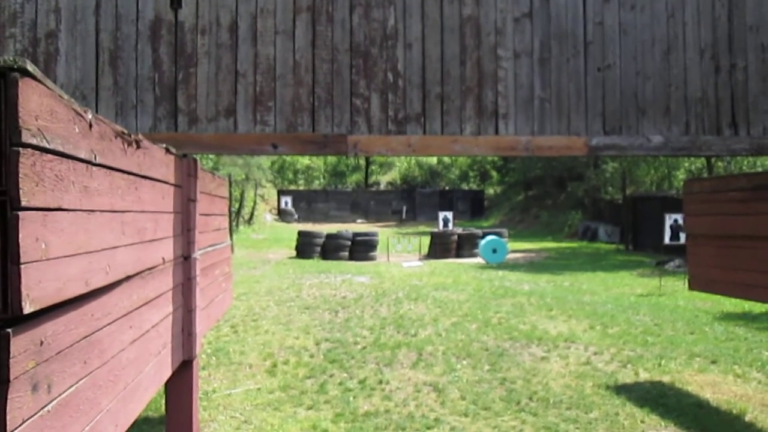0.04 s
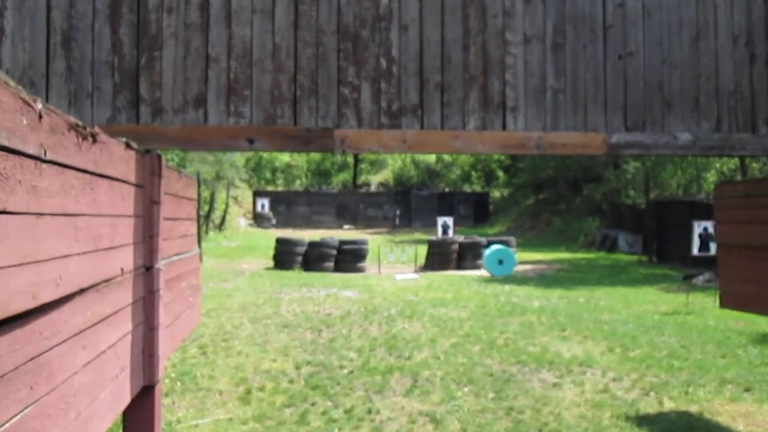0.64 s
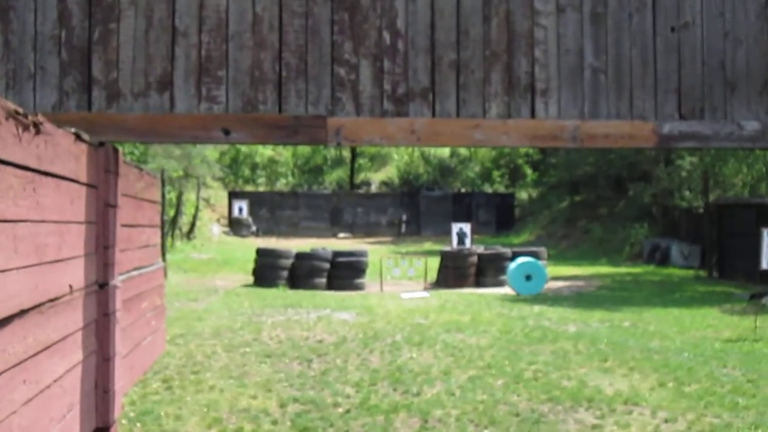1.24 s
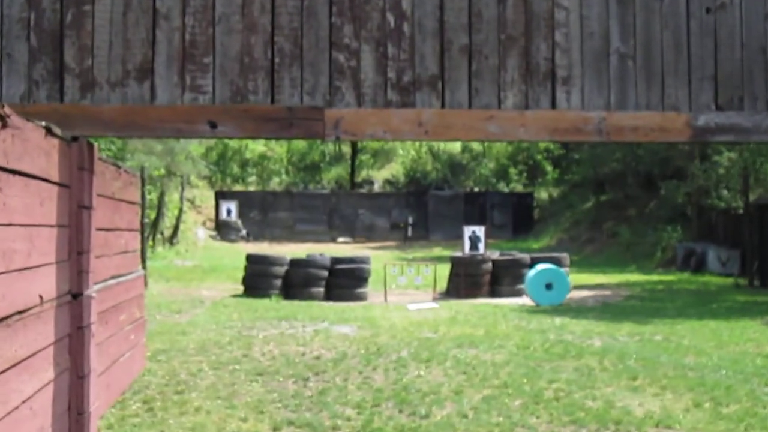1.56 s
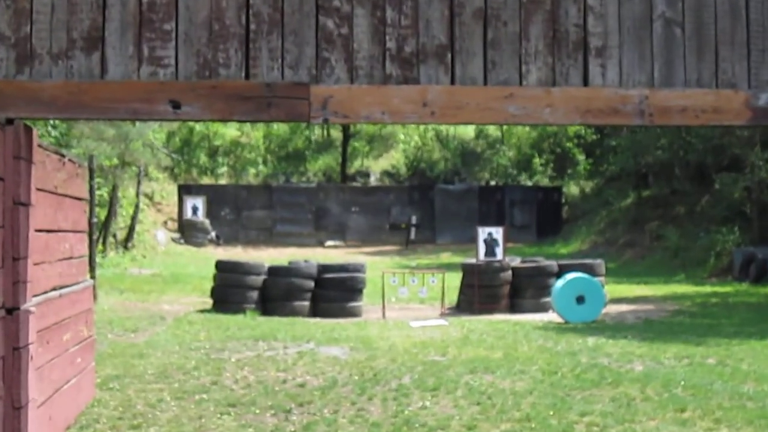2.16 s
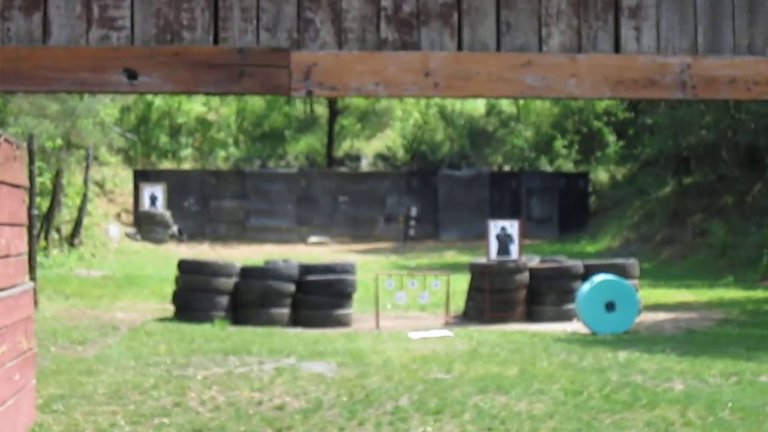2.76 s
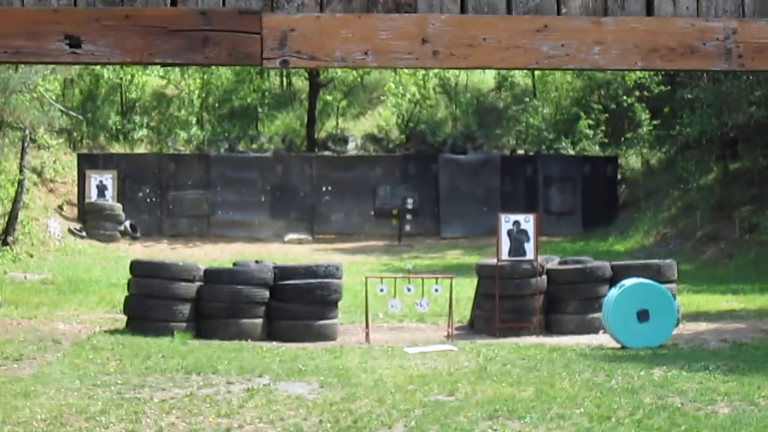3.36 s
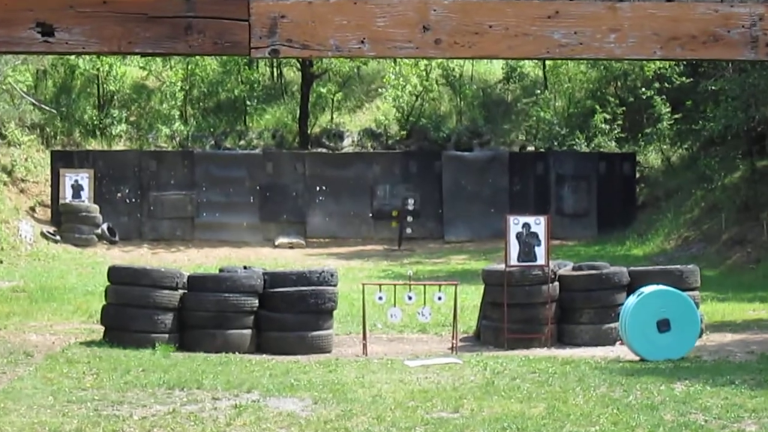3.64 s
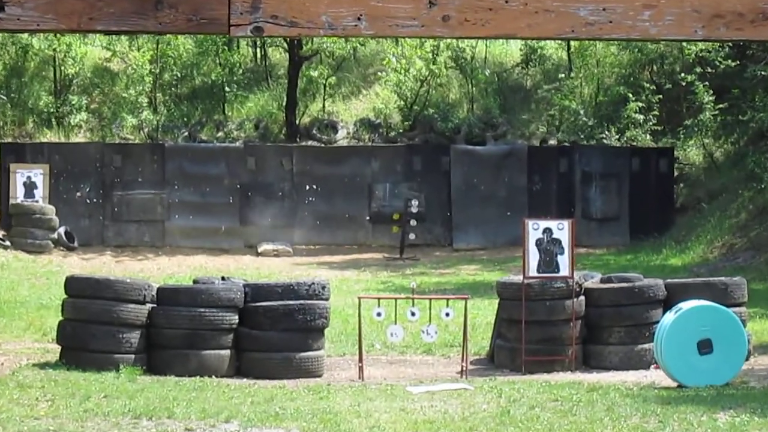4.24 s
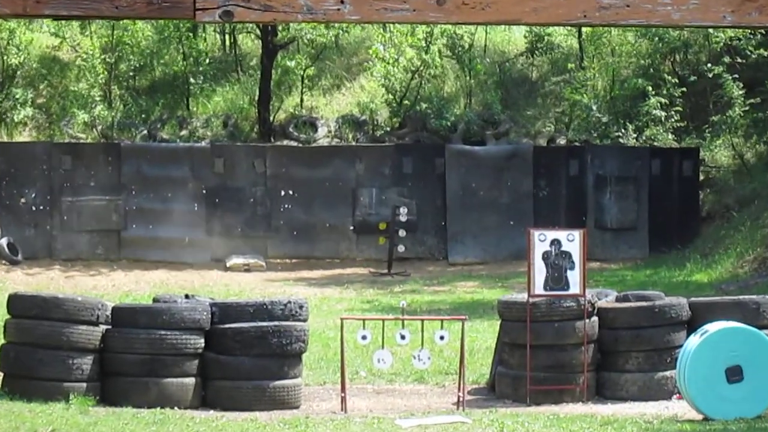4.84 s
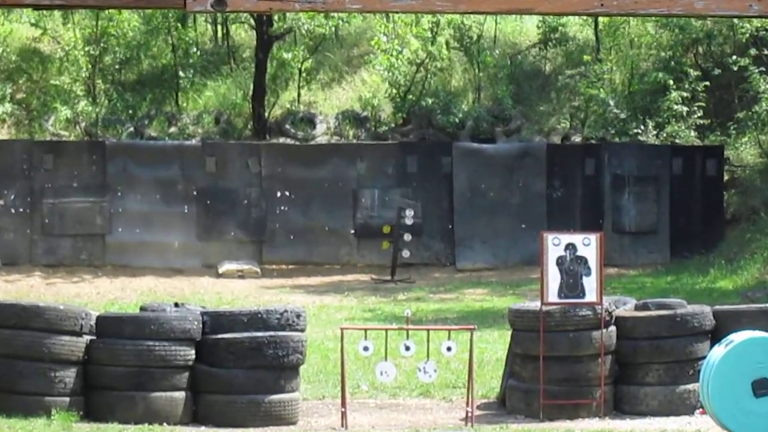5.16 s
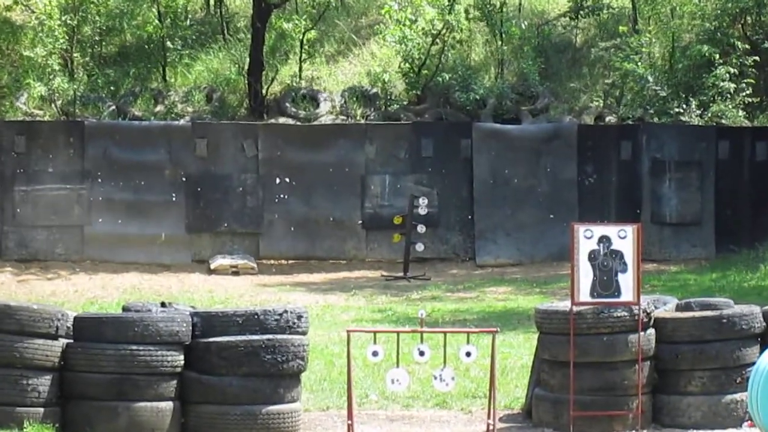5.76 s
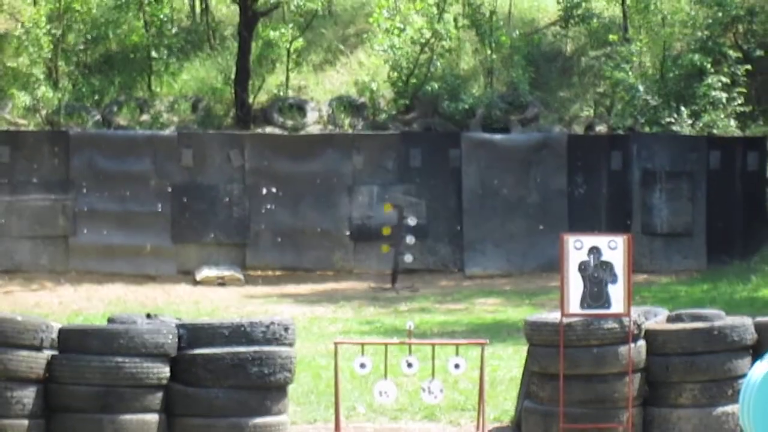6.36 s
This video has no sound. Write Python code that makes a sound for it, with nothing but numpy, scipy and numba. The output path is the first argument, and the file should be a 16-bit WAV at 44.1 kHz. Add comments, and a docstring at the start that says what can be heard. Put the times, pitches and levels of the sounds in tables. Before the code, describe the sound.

Over a quiet outdoor rumble and the thin whirr of a zoom motor, three sharp rifle cracks hit a nearby microphone hard enough to distort. Each booms in a wooden shelter and is answered almost at once by a far steel target's clang and fading woodland echoes. The level ducks after each blast and creeps back, revealing a small brass tinkle after the first two shots and a few soft wooden knocks.

```python
"""Over a low outdoor rumble and a camera's whirring zoom motor, a rifle fires three times from a wooden
shelter. Each blast overloads the microphone and the gain control ducks. The shelter reverberates, the side
banks answer, and 0.19 s after the shot a steel plate far downrange is heard to clang. Echoes of backstop
and woods follow and a low roll dies away. As the gain creeps back between shots, a spent case tinkles on
the floor and wood knocks lightly at the bench."""
import sys
import numpy as np
from scipy import signal
from scipy.fft import rfft, irfft, next_fast_len
from scipy.io import wavfile
from numba import njit

SR = 44100
rng = np.random.default_rng(int(sys.argv[2]) if len(sys.argv) > 2 else 0)


def master(y):
    """Save y as 16-bit WAV."""
    cut = np.clip(np.atleast_2d(y).T, -1, 1)
    pcm = np.round(cut * 32767)  # scale
    wavfile.write(sys.argv[1], SR, pcm.astype(np.int16))


N = 282681
T = np.arange(N) / SR

# the three shots: start_s, blast_db, roll_db, plate_delay_s, impact_db
SHOTS = [(0.1044, 6, -10.5, 0.19, 0.5), (2.4812, 6, -11.5, 0.192, -1), (6.036, 6.5, -12, 0.191, -0.5)]


def undb(db):
    """Amplitude ratio: tenfold for every 20 dB."""
    return 10 ** (np.asarray(db) / 20)


def at_hz(table, hz):
    """Interpolation of (frequency_hz, value) points on a logarithmic frequency axis."""
    points, values = np.transpose(table)
    return np.interp(np.log(np.maximum(hz, 1)), np.log(points), values)


def colour(x, spectrum, size=4096):
    """Minimum-phase filtering: folding the cepstrum gives a causal response with this spectrum."""
    cepstrum = irfft(np.log(undb(at_hz(spectrum, np.fft.rfftfreq(size, 1 / SR)))))
    cepstrum[1:size // 2] *= 2
    cepstrum[size // 2 + 1:] = 0
    response = irfft(np.exp(rfft(cepstrum)))
    return signal.fftconvolve(x, response)[:len(x)]


def noise(spectrum, n):
    """Spectral shaping: white noise is weighted by the spectrum and scaled to rms 1."""
    size = next_fast_len(n)
    weights = undb(at_hz(spectrum, np.fft.rfftfreq(size, 1 / SR)))
    x = irfft(rfft(rng.standard_normal(size)) * weights, size)[:n]
    return x / x.std()


def fade(t, rise_s, t60):
    """Exponential damping after a swell: the decay loses 60 dB in t60 seconds."""
    return (1 - np.exp(-t / rise_s)) * np.exp(-np.log(1000) * t / t60)


def reverberation(spectrum, t60s, rise_s, t):
    """Diffuse field: dense reflections merge into noise, each octave decaying at its own rate."""
    bins, hz = rfft(noise(spectrum, len(t))), np.fft.rfftfreq(len(t), 1 / SR)
    octave = np.log2(np.clip(hz, 30, 15360) / 30)
    out = 0
    for k in range(10):
        band = irfft(bins * np.maximum(1 - abs(octave - k), 0), len(t))
        centre_hz = 30 * 2 ** k
        out = out + band * fade(t, rise_s, at_hz(t60s, centre_hz))
    return out


def ring(hz, t60, rise_s, scatter, flutter_hz, t):
    """Interference: reflections arriving out of step make one damped metal mode flutter."""
    knots = rng.standard_normal((1024, 2))
    in_phase, quadrature = (np.interp(t * flutter_hz, np.arange(len(knots)), k) for k in knots.T)
    phase = 2 * np.pi * (hz * t + rng.random())
    tone = (1 + scatter * in_phase) * np.sin(phase) + scatter * quadrature * np.cos(phase)
    return tone * fade(t, rise_s, t60)


def add(out, start_s, x):
    """Superposition: x adds to out from start_s on."""
    i = max(int(start_s * SR), 0)
    out[i:i + len(x)] += x[:max(N - i, 0)]


@njit
def follow(x, attack, release):
    """Peak detection: a one-pole smoother with separate rates for rise and fall."""
    out, level = np.empty(len(x)), 0.
    for i in range(len(x)):
        level += (x[i] - level) * (attack if x[i] > level else release)
        out[i] = level
    return out


def outdoors(level_db=-51, waver_db=-1.14):
    """Amplitude modulation: a low, distant rumble wavers with the air."""
    # rumble spectrum: frequency_hz, level_db
    rumble_spectrum = [(25, -2), (70, 1.5), (110, 0), (200, 1), (400, -4.5), (650, -10.5), (950, -10),
                       (1400, -23.5), (1900, -23.5), (2600, -30.5), (15000, -51.5)]
    waver = np.interp(T, np.linspace(0, T[-1], 48), rng.standard_normal(48))
    return noise(rumble_spectrum, N) * undb(level_db + waver_db * waver)


def zoom_motor(level_db=-61.5, step_hz=33.23, tick_db=7.0, kick_depth=0.3, uneven_db=1.5):
    """Forced vibration: the lens drive whirrs, ticks at each step and excites the barrel's resonances."""
    # spectra of the drive's whirr and tick: frequency_hz, level_db
    whirr_spectrum = [(1500, -32), (2400, -17), (2900, -3.5), (3700, -17.5), (4400, -14), (4950, 4),
                      (5400, -4.5), (6100, -3), (7700, -19), (9600, -17), (11500, -22.5), (15000, -27)]
    tick_spectrum = [(1500, -21), (2800, -4.5), (3800, -3.5), (4900, -8.5), (6300, -2.5), (7500, -14.5),
                     (9300, -11.5), (10500, -10.5), (12000, -23), (15000, -30.5)]
    # resonances of the lens barrel: centre_hz, width_hz, level_db
    barrel_resonances = [(8650, 300, -14), (12800, 1200, -16)]
    steps = T * step_hz
    strengths = undb(uneven_db * rng.uniform(-1, 1, N))[steps.astype(int)]
    ticks = noise(tick_spectrum, N) * strengths * np.exp(-((steps % 1 - .11) / .075) ** 2)
    whirr = undb(1.35) * noise(whirr_spectrum, N)
    for hz, width_hz, db in barrel_resonances:
        band = signal.butter(2, [hz - width_hz / 2, hz + width_hz / 2], "bandpass", fs=SR, output="sos")
        resonance = signal.sosfilt(band, rng.standard_normal(N))
        whirr += undb(db) * resonance / resonance.std()
    whirr *= 1 + kick_depth * np.cos(12 * np.pi * steps)  # six small kicks a step
    return (whirr + undb(tick_db) * ticks) * undb(level_db)


def bench_knocks():
    """Heavy damping: lightly knocked wood gives only a brief burst of noise."""
    # knocks at the bench: start_s, level_db
    knocks = [(1.966, -58.5), (3.917, -50), (5.48, -51), (5.67, -50.5)]
    # spectrum of a knock: frequency_hz, level_db
    knock_spectrum = [(100, -5), (600, -4), (1800, -3), (3500, -13), (15000, -32)]
    out, t = np.zeros(N), T[:SR // 2]
    for start_s, db in knocks:
        add(out, start_s, undb(db) * noise(knock_spectrum, len(t)) * fade(t, rise_s=0.00076, t60=0.024))
    return out


def landings(start_s, hop_s, tip_s=0.026, tip_db=-3.5, hop_shrink=0.67, hop_db=-23):
    """Inelastic bouncing: a case lands, tips onto its other end and hops twice; gives time_s, level_db."""
    return [(start_s, 0), (start_s + tip_s, tip_db),
            (start_s + hop_s, hop_db), (start_s + hop_s * (1 + hop_shrink), 2 * hop_db)]


def spent_cases(rim_hz=12840, rim_db=-54, rim_loss_share=0.5):
    """Impact excitation: a brass case clatters on the hard floor; its body and thin rim ring."""
    # falling cases: start_s, clatter_db, body_hz, body_db, first_hop_s
    cases = [(0.775, -36, 2980, -42.5, 0.12), (4.284, -50, 2260, -46.5, 0.172)]
    # spectrum of a contact: frequency_hz, level_db
    clatter_spectrum = [(300, -2), (1800, 10), (3000, 5.5), (8000, -7), (15000, -40)]
    out, t = np.zeros(N), T[:SR // 2]
    for start_s, clatter_db, body_hz, body_db, hop_s in cases:
        for contact_s, db in landings(start_s, hop_s):
            clatter = noise(clatter_spectrum, len(t)) * fade(t, rise_s=0.0038, t60=0.257)
            body = ring(body_hz, t60=0.29, rise_s=0.0043, scatter=1.0, flutter_hz=257.0, t=t)
            rim = ring(rim_hz, t60=0.21, rise_s=.002, scatter=0.96, flutter_hz=300, t=t)
            add(out, contact_s, undb(clatter_db + db) * clatter + undb(body_db + db) * body)
            add(out, contact_s, undb(rim_db + rim_loss_share * db) * rim)
    return out


def steel_plate(late_db=-14.0, late_stretch=1.54):
    """Modal vibration: a bullet smacks the plate, whose ring lingers between the banks."""
    # plate modes, struck on a new spot each time: pitch_hz, t60_s, first_db, second_db, third_db
    modes = [(2520, 0.57, -22, -22, -41), (3240, 0.42, -41, -21.5, -34), (3892, 0.51, -28.5, -23, -22),
             (4724, 0.28, -19.5, -27, -17), (4800, 0.36, -26, -41, -24), (5766, 0.73, -34, -29.5, -44),
             (5830, 0.28, -19, -26, -42), (5880, 0.43, -38, -19, -20.5), (5910, 0.5, -24, -41, -22.5),
             (6541, .55, -37, -34, -50.5), (7410, 0.63, -27, -26, -40), (7520, 0.35, -38, -27, -47.5),
             (7830, 0.32, -24, -41.5, -33), (8800, 0.36, -23, -24, -37), (8900, 0.68, -36.5, -31, -43),
             (9300, 0.48, -33, -43, -37), (9820, 0.285, -26, -52.5, -24.5)]
    # spectra of the smack and its reverberation: frequency_hz, level_db
    smack_spectrum = [(60, -19), (250, 1.5), (700, -4.5), (1500, 4.5), (2300, -6.5), (3500, -18.5),
                      (7000, -25), (15000, -38)]
    spread_spectrum = [(60, -22), (250, -4.5), (800, -0.5), (1450, 1), (2300, -5.5), (3500, -13),
                       (6000, -14), (10000, -20), (15000, -31)]
    # reverberation times of the smack: frequency_hz, t60_s
    spread_decay = [(100, 0.59), (1400, 0.53), (4000, 0.58), (8000, 0.33), (14000, 0.22)]
    out, t = np.zeros(N), T[:SR]
    for hit, (start_s, _, _, delay_s, impact_db) in enumerate(SHOTS):
        smack = undb(11.5) * noise(smack_spectrum, len(t)) * fade(t, rise_s=0.00052, t60=0.021)
        spread = undb(-6) * reverberation(spread_spectrum, spread_decay, rise_s=0.0064, t=t)
        clang = 0
        for hz, t60, *hit_db in modes:
            direct = ring(hz, t60, rise_s=0.0019, scatter=0.93, flutter_hz=112.0, t=t)
            late = ring(hz, t60 * late_stretch, rise_s=0.15, scatter=1.0, flutter_hz=60.5, t=t)
            air_db = -10 * np.log2(hz / 5000)  # the longer path favours the low modes
            clang = clang + undb(hit_db[hit]) * (direct + undb(late_db + air_db) * late)
        add(out, start_s + delay_s, undb(impact_db) * (smack + spread) + undb(2.5) * clang)
    return out


def woods_roll(patchy_db=3.5, patch_hz=40):
    """Scattering: clumps of trees return the blast in patches as it rolls away."""
    # spectrum of the roll: frequency_hz, level_db
    roll_spectrum = [(25, -24), (70, -16.5), (120, -12), (175, 2), (260, -3.5), (450, -9.5), (900, -12),
                     (1800, -14.5), (4000, -18.5), (9000, -37), (15000, -53)]
    # reverberation times of the woods: frequency_hz, t60_s
    roll_decay = [(50, 3.6), (180, 2.91), (450, 2.66), (1000, 1.82), (2000, 1.45), (5000, 1.1),
                  (12000, 0.73)]
    t = T[:3 * SR]
    patches = np.interp(t * patch_hz, np.arange(SR), np.tanh(rng.standard_normal(SR)))
    return undb(patchy_db * patches) * reverberation(roll_spectrum, roll_decay, rise_s=0.056, t=t)


def surroundings():
    """Reflection: a blast fills the shelter and returns from banks, backstop and woods."""
    # spectra of the reflected blast: frequency_hz, level_db
    shelter_spectrum = [(25, -27), (60, -18.5), (120, -11.5), (250, -2.5), (400, -3.5), (580, 1),
                        (900, -9.5), (1600, -14.5), (3000, -25), (7000, -32), (15000, -42.5)]
    banks_spectrum = [(40, -24), (120, -13.5), (250, 1.5), (400, -0.5), (600, 2), (1000, -7.5),
                      (2000, -15.5), (5000, -29), (15000, -52)]
    echo_spectrum = [(30, -12), (90, 2), (250, 5), (500, -6), (900, -3.5), (1500, -5), (3000, -8),
                     (6000, -2), (15000, -23.5)]
    # reverberation times of the shelter: frequency_hz, t60_s
    shelter_decay = [(60, .7), (250, 0.71), (600, 0.58), (2000, 0.61), (6000, .55), (14000, 0.56)]
    # distinct echoes: delay_s, level_db, rise_s, t60_s, low_edge_hz, high_edge_hz
    echoes = [(0.2759, -0.5, 0.00084, 0.095, 49.9, 1520), (0.299, -20, .003, 0.27, 61.6, 1510),
              (0.459, -17, 0.000602, 0.14, 750, 2420), (0.485, -27, 0.00595, 0.515, 130, 1990),
              (0.729, -47, .002, 0.19, 500, 2180)]
    out, t = np.zeros(N), T[:SR]
    add(out, 0, undb(5.5) * reverberation(shelter_spectrum, shelter_decay, rise_s=0.0054, t=t))
    banks_swell = np.exp(-((t - .115) / 0.052) ** 2)
    add(out, 0, undb(-1) * noise(banks_spectrum, len(t)) * banks_swell)
    for delay_s, db, rise_s, t60, low_hz, high_hz in echoes:
        band = signal.butter(2, [low_hz, high_hz], "bandpass", fs=SR, output="sos")
        echo = signal.sosfilt(band, noise(echo_spectrum, len(t)))
        add(out, delay_s, undb(db) * echo * fade(t, rise_s, t60))
    return out


def muzzle_blast(lead_s, pre_ring_s=0.0015, crack_db=-18, pulse_db=5, push_s=.0004, snap_db=-14):
    """Blast wave: a sharp crack and steep thump at lead_s, then a longer suction."""
    # spectrum of the crack: frequency_hz, level_db
    crack_spectrum = [(40, -11.5), (300, -9.5), (800, -4), (1400, -1.5), (2200, -5), (4000, -31),
                      (15000, -44.5)]
    t = T[:SR // 50] - lead_s
    # the recorder's filter rings briefly ahead of the peak
    crack = noise(crack_spectrum, len(t)) * np.exp(-abs(t) / pre_ring_s)
    age = np.maximum(t, 0) / push_s
    pulse = (t > 0) * (1 - age) * np.exp(-age)
    # the shock front tears into a bright snap
    snap = rng.standard_normal(len(t)) * fade(np.maximum(t, 0), rise_s=.0001, t60=.007)
    return undb(crack_db) * crack / crack.std() + undb(pulse_db) * pulse + undb(snap_db) * snap


def rifle(change=.5, lead_s=.008):
    """Partial coherence: each shot meets the same reflectors, changed a little as camera and air move."""
    out, common = np.zeros(N), surroundings()
    for start_s, blast_db, roll_db, _, _ in SHOTS:
        add(out, start_s - lead_s, undb(blast_db) * muzzle_blast(lead_s))
        reflections = (common + change * surroundings()) / np.hypot(1, change)
        add(out, start_s, undb(blast_db) * reflections)
        add(out, start_s, undb(roll_db) * woods_roll())
    return out


def scene():
    """Superposition: all sources sum to one channel at the firing point."""
    return (rifle() + steel_plate() + spent_cases() + bench_knocks() + zoom_motor() + outdoors())[None]


def record(dry, ceiling=1.246, leak=.07, target_peak=0.4, max_gain_db=5):
    """Saturation and compression: the microphone overloads; the gain ducks late and recovers slowly."""
    # microphone response: frequency_hz, gain_db
    microphone_response = [(20, -5), (70, -2), (400, -2), (900, -1), (1500, 1), (2600, 0), (5000, -0.5),
                           (11000, -3), (16000, -7)]
    lag_s, attack_s, release_s, top_hz = .0014, .001, 2.83, 15800
    overloaded = leak * dry[0] + (1 - leak) * dry[0] / np.sqrt(1 + (dry[0] / ceiling) ** 2)
    peak = follow(abs(overloaded), 1 / (attack_s * SR), 1 / (release_s * SR))
    late_peak = np.interp(T - lag_s, T, peak)
    gain = target_peak / np.maximum(late_peak, target_peak / undb(max_gain_db))
    coloured = colour(overloaded * gain, microphone_response)
    limited = coloured / (1 + coloured ** 4) ** (1 / 4)
    lowpass = signal.ellip(10, .2, 80, top_hz, fs=SR, output="sos")
    return signal.sosfilt(lowpass, limited)[None]


dry = scene()
out = record(dry)
master(out)
```